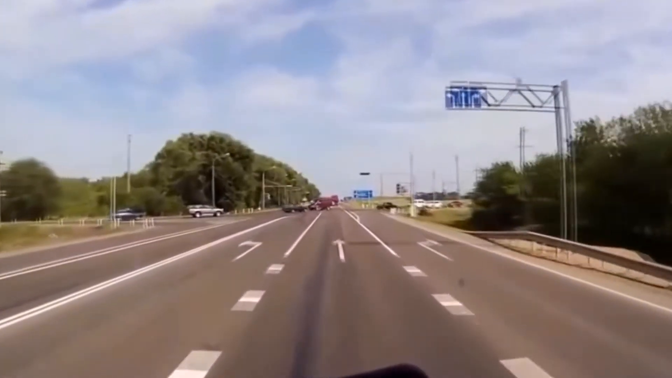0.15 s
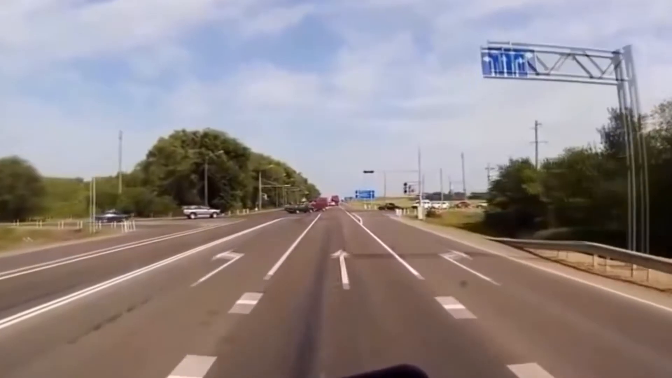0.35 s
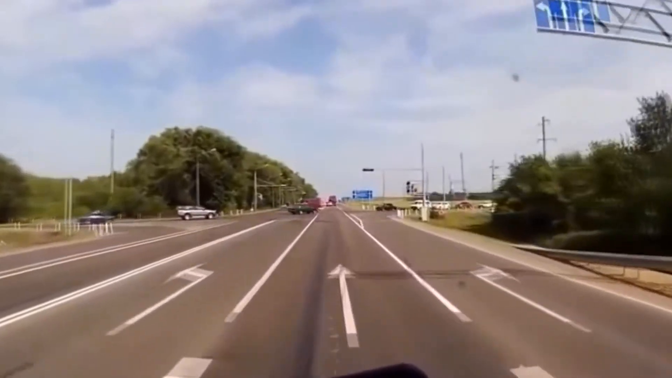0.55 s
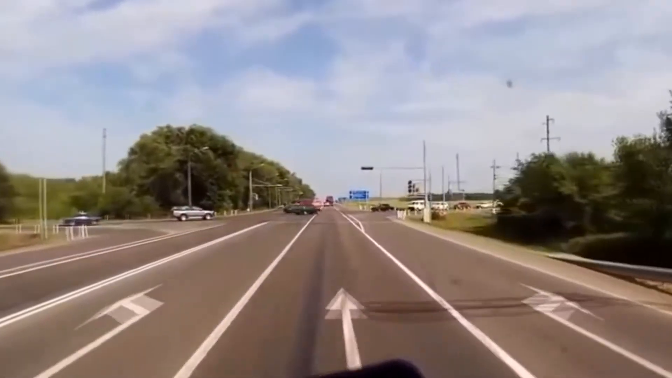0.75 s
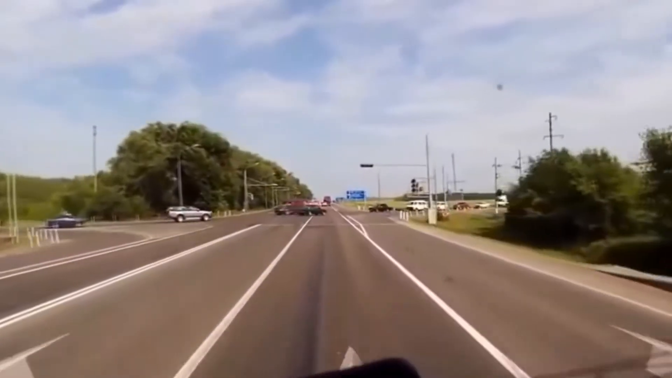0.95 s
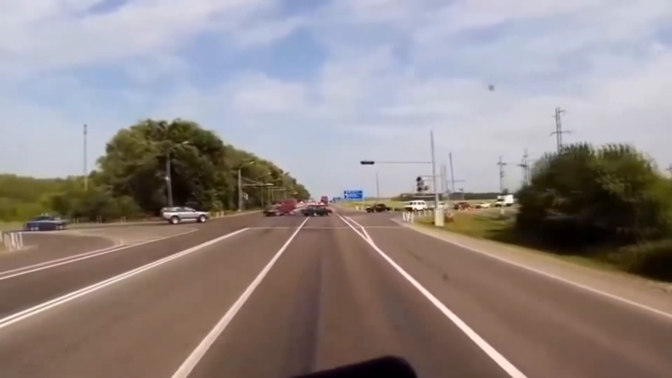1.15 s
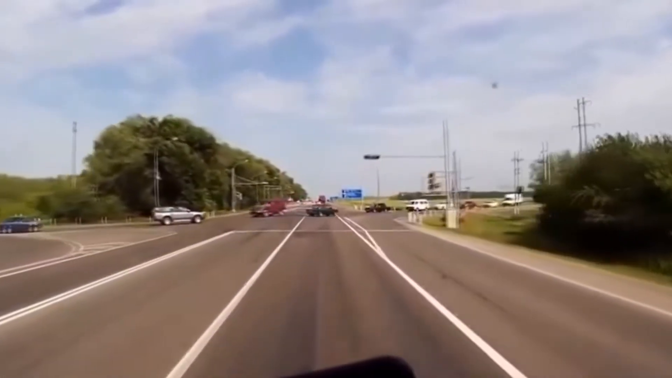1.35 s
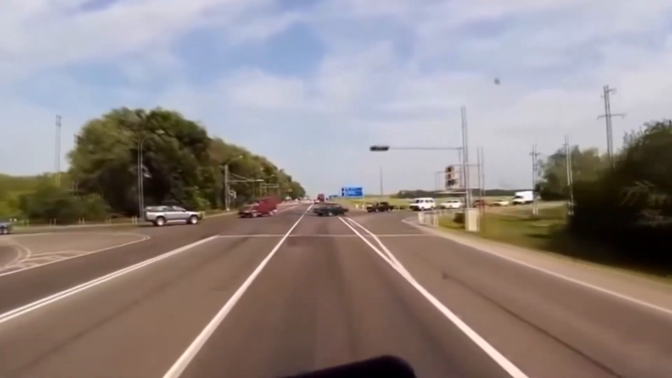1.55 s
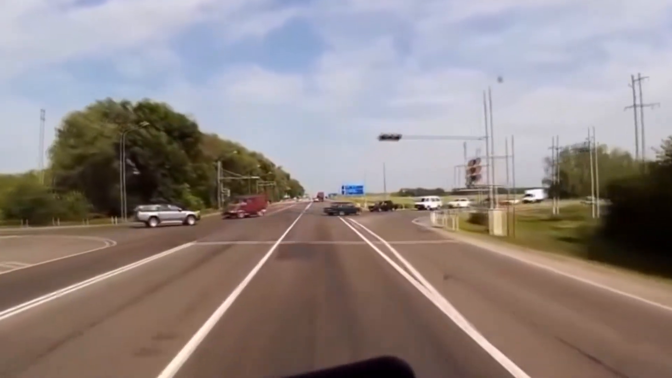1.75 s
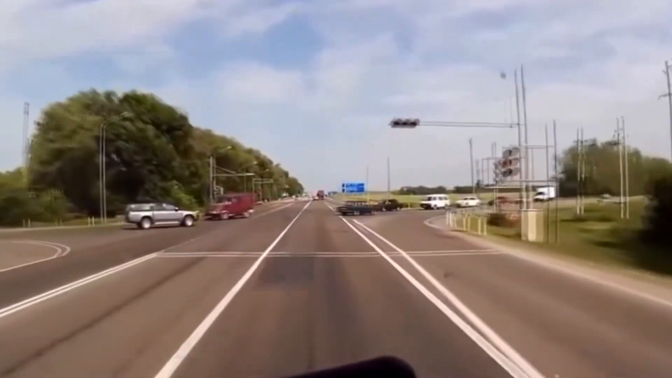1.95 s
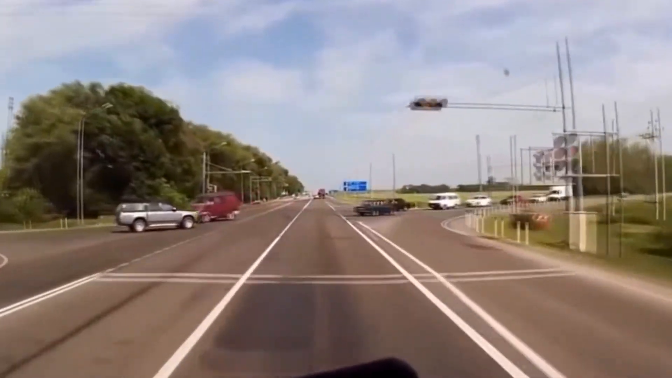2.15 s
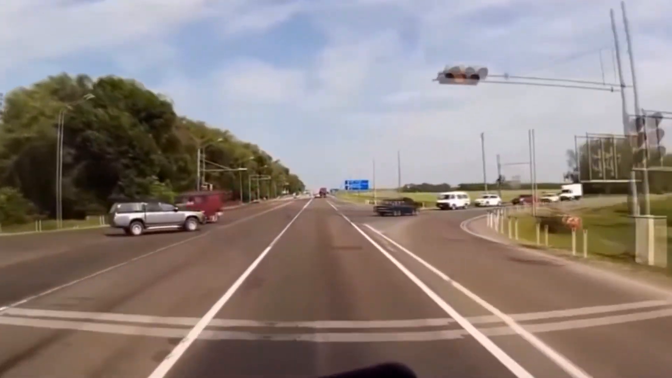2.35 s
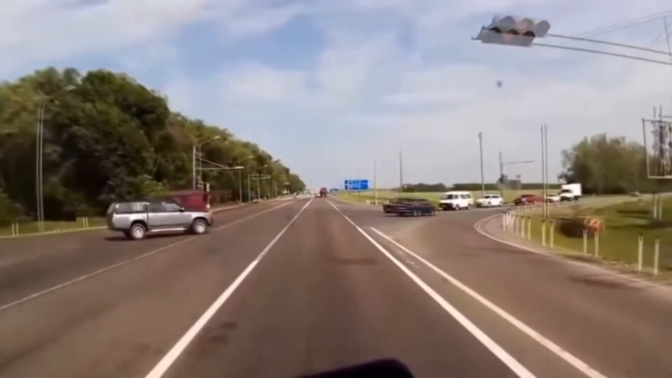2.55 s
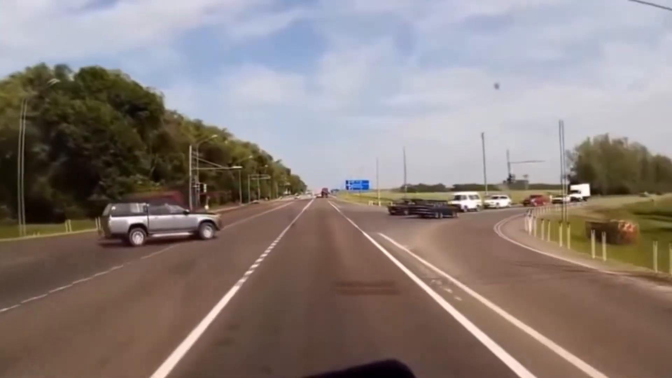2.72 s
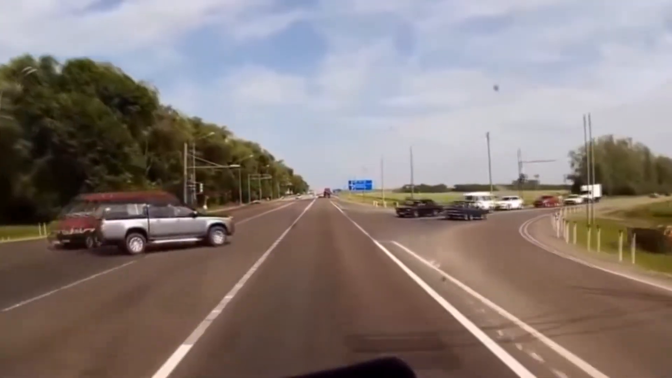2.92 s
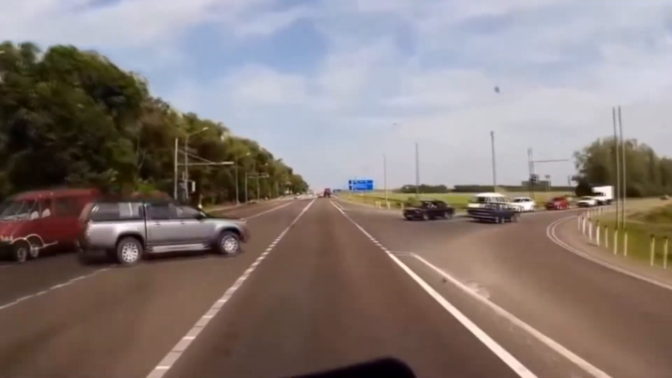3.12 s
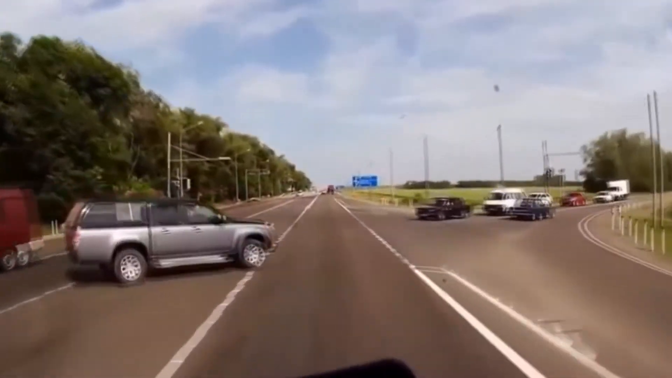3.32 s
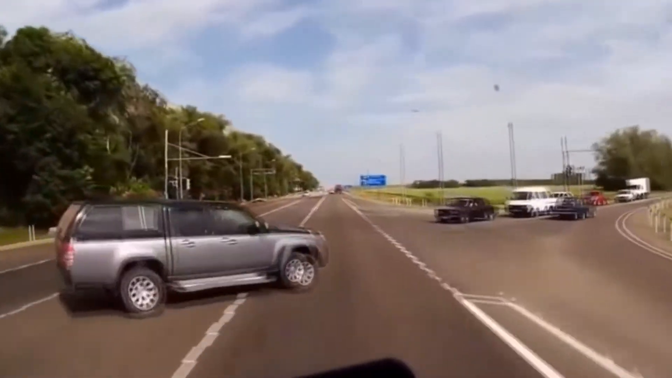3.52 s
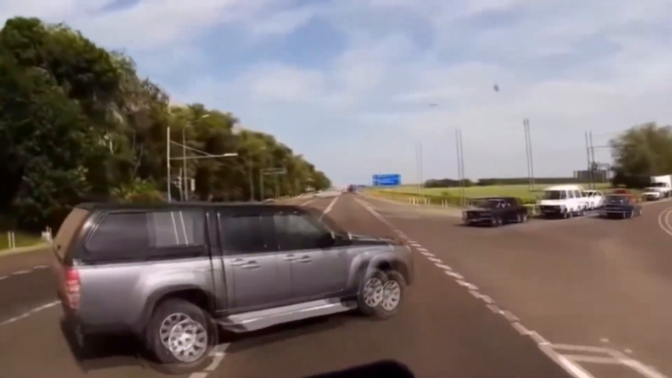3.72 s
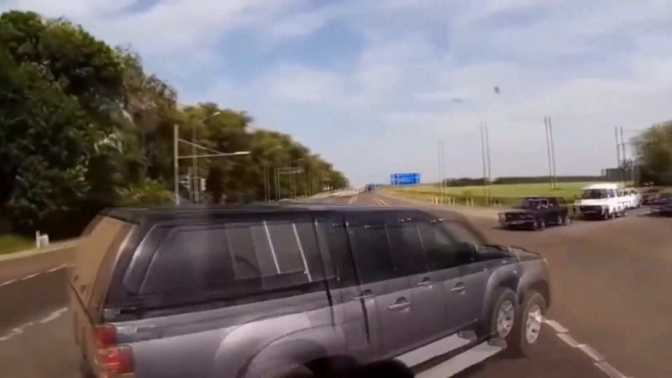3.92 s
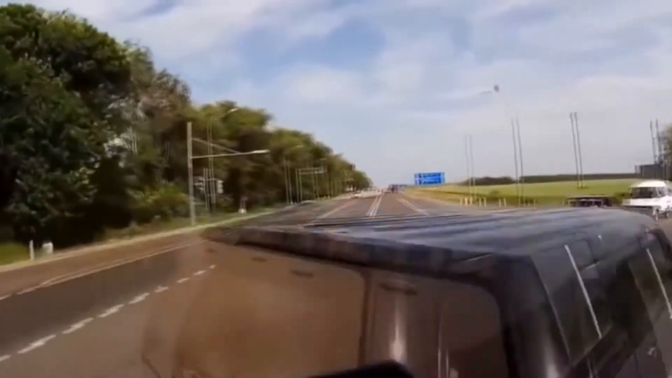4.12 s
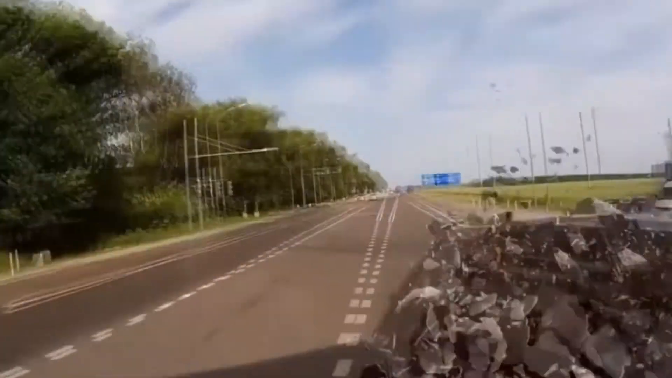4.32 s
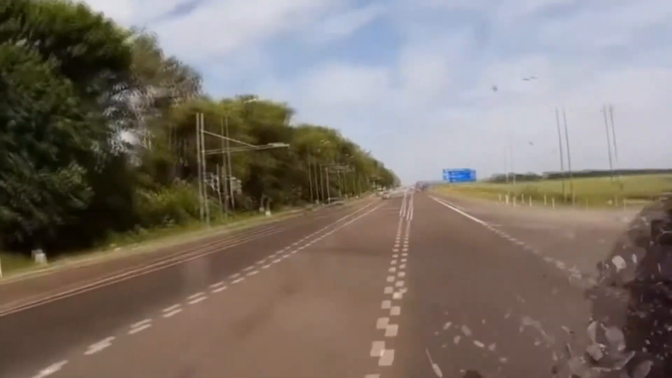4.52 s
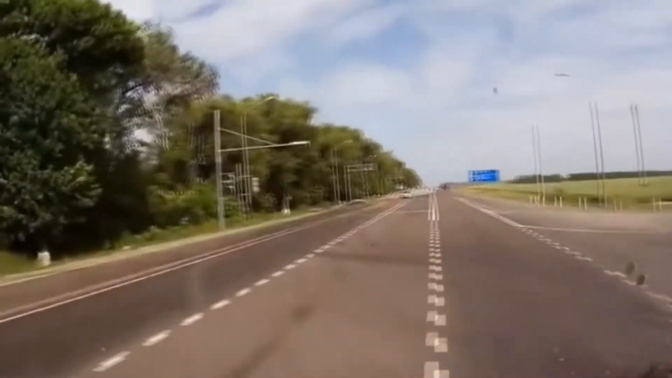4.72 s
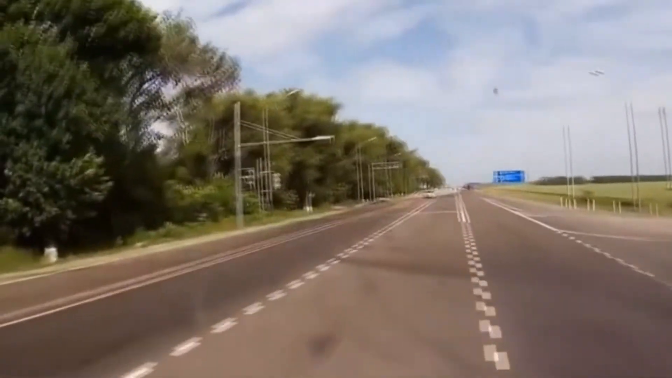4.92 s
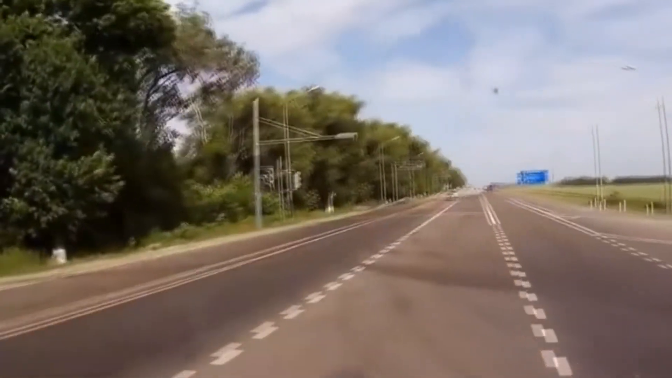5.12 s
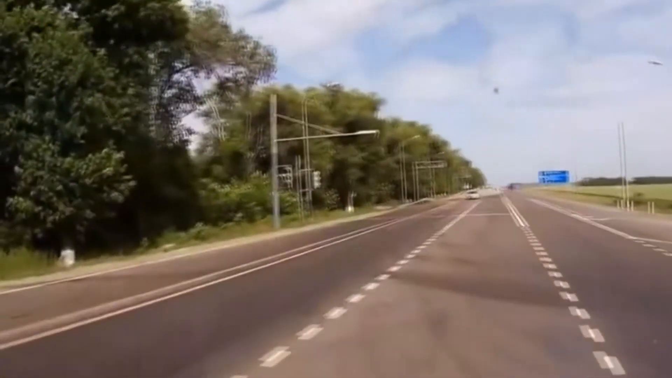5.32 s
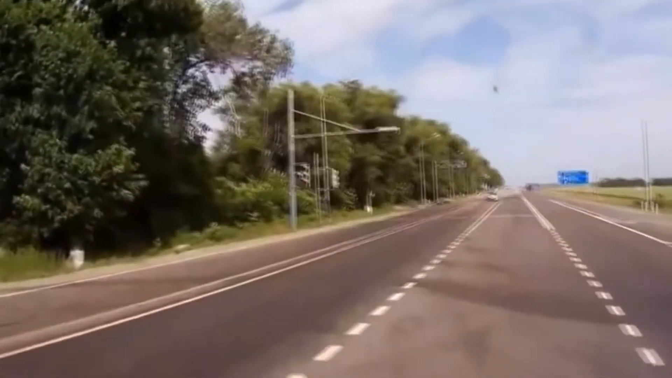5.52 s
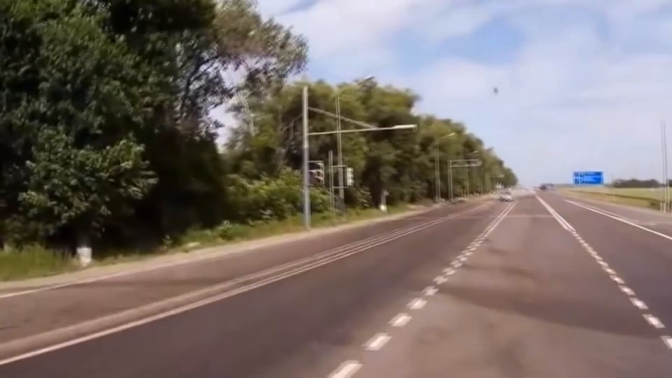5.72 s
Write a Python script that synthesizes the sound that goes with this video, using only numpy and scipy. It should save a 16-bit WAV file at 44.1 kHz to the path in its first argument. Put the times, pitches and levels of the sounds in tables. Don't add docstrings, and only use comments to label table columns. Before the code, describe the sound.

A close, boxy truck cab at highway speed, heard by a small dashboard microphone, nearly mono. For the first 2.4 seconds a steady low engine hum sits over deep cab boom and dull tyre roar, with barely audible trim noise. The driver lifts off; the engine drone sags and vanishes by about 2.7, with a hard pedal clack at 2.67. More knocks come around 3.1 to 3.25, then braked tyres scrub brightly and moan at a nearly steady middle pitch from 3.3 to 4.3, joined by a faint rising squeal from 4.1. At 4.33 the collision hits: a violent, clipped burst of heavy thuds, crumpling panels and shattering glass, strongest until about 4.65 and fading by 4.9. Afterwards a deep wobbling boom continues while torn parts clack, chips tick and loose debris and trim rattle, thinning out to the end at 5.76.

```python
import sys
import numpy as np
from scipy import signal
from scipy.fft import rfft, irfft, next_fast_len
from scipy.io import wavfile
from scipy.ndimage import uniform_filter1d, map_coordinates

SR = 44100
rng = np.random.default_rng(int(sys.argv[2]) if len(sys.argv) > 2 else 0)


def nominal_scale(level):
    x = np.asarray(level, float) / 20
    return 10 ** x


def wav_record(signal):
    frames = np.transpose(np.atleast_2d(signal))
    bounded = np.clip(frames, -1, 1)
    quanta = np.round(bounded * 32767).astype(np.int16)
    wavfile.write(sys.argv[1], SR, quanta)


N = 254016
TIME = np.arange(N) / SR

# time in seconds, level in dB.
CRUSH_FORCE = [(4.325, -56), (4.336, -9.5), (4.346, 1), (4.365, 4.5), (4.45, -3), (4.5, -0.5),
               (4.65, -13.5), (4.8, -23), (4.92, -35.5)]
# start in seconds, level in dB, pitch in Hz signed by direction, t60 in seconds.
CHASSIS_BLOWS = [
    (4.338, -0.5, 58.5, 0.13),
    (4.371, 5.5, -50, 0.18),
    (4.412, -5, 90.5, 0.22),
    (4.441, 5.5, -30, 0.35),
    (4.517, 4, -185, 0.15),
    (4.55, -2.5, 33.5, 0.12),
    (4.599, -6, 30.5, 1),
]
# centre in Hz, width in Hz, level in dB.
PANEL_MODES = [(73.2, 23.7, 6), (124.7, 32.5, 6.5), (196.3, 46.7, 6.5), (289, 121, 1.5), (480, 378, -4),
               (832, 328, -6), (1440, 350, -12)]
# time in seconds, half length
# in seconds, direction.
LIMIT_SHOVES = [(4.378, .0018, -1), (4.389, .001, 1), (4.451, .004, -1), (4.467, .002, 1),
                (4.49, .0022, -1), (4.506, .001, 1), (4.516, .001, 1), (4.606, .004, 1), (4.628, .002, -1)]
# time in seconds, half length in seconds, level in
# dB, direction.
BRIEF_PUSHES = [
    (4.495, .004, -6.5, -1),
    (4.556, 0.0026, -8, -0.92),
    (4.619, 0.0049, -9, 0.88),
    (4.642, 0.0024, -12, -1),
]
# time in seconds, level in dB over the shatter, fade in seconds.
PANE_CRACKS = [(4.4555, 1.5, 0.0067), (4.4824, 2.5, .006), (4.493, 7, 0.013), (4.52, 4.5, 0.0088),
               (4.55, 7, 0.022), (4.575, 0.5, 0.018), (4.612, 1.5, .014), (4.633, 3.5, 0.011),
               (4.647, 3.5, 0.0087), (4.672, 3, 0.011)]
# frequency in Hz, level in dB per Hz.
GLASS_SPECTRUM = [(400, -120), (600, 1.5), (1500, 0.5), (2500, -5), (4000, -9.5), (8000, -37), (15500, -39),
                  (16000, -120)]
HUSH_DB, SHOVE_DB = -12, -3
GLASS_DB, GLASS_GROWS = -13.5, 0.63
GLASS_GONE_S, GLASS_GONE_DB, GLASS_DULL_S = 4.7, -12, 4.68

# time in seconds, pitch in Hz.
BOOM_PITCH = [(0, 33.6), (2.35, 32.61), (2.5, 27.1), (2.95, 25.2), (3.26, 27.94), (3.6, 25.57),
              (3.85, 33.41), (4.15, 38.97), (5.76, 37.8)]
# frequency in Hz, level in dB per Hz.
THROB_SPECTRUM = [(15, -120), (20, 22), (27, 4), (36, 8.5), (48, -26), (70, -37), (120, -120)]
# time in seconds, boom in dB, rumble in dB, half length in seconds.
ROAD_BUMPS = [(0.0, -20, -23, 0.0072), (0.256, -41, -46, 0.04), (0.55, -38, -46, 0.15),
              (1.07, -35, -46, 0.14), (1.385, -29.5, -39, 0.024), (1.62, -35, -48, 0.057),
              (1.936, -37, -49, 0.066), (2.152, -38, -41, 0.057), (2.27, -29, -36, 0.074),
              (2.486, -40, -27, 0.03), (2.725, -24.5, -31.5, 0.041), (2.935, -26.5, -48, 0.12),
              (3.286, -24, -30.5, 0.14), (3.535, -41, -27.5, 0.028), (3.62, -32, -36, 0.033),
              (3.804, -27, -29.5, 0.084), (4.127, -29, -36, 0.16), (4.276, -30.5, -56, 0.045),
              (4.875, -36, -26, 0.0067), (4.999, -31, -26.5, 0.023), (5.11, -23, -44, 0.023),
              (5.261, -25.5, -25.5, 0.044), (5.452, -39, -38.5, 0.24), (5.76, -42, -46, 0.028)]
BOOM_DB, FREE_BOOM_DB = -34, -26.5

# time in seconds, level in dB.
TYRE_LOAD = [(0, -43), (3.05, -42.5), (3.27, -34.5), (4.05, -35), (4.22, -33), (4.86, -33), (5.14, -45),
             (5.27, -37), (5.76, -46.5)]
# time in seconds, braking share from 0 to 1.
BRAKING_SHARE = [(3.1, 0.19), (3.3, 0.82), (4.3, 0.73), (4.9, 0.45), (5.3, 0.6)]
# frequency in Hz, level in dB per Hz.
RUMBLE_SPECTRUM = [(26, -36), (45, 4.5), (60, 1), (210, 3), (302, -10), (355, -7.5), (421, -23.5),
                   (466, -25), (500, -21), (650, -20), (1100, -120)]
ROAR_SPECTRUM = [(180, -10.5), (300, -6), (412, -8.5), (507, -5.5), (550, -9), (863, -12.5), (962, -16.5),
                 (1340, -19.5), (2600, -40.5), (3380, -75), (5720, -120)]
SCRUB_SPECTRUM = [(310, -18), (520, -2.5), (699, -3), (774, -21.5), (873, -2), (1070, -2), (1500, -1.5),
                  (2270, -22), (2600, -29.5), (3380, -58), (5720, -120)]
RUMBLE_DB, BRAKED_RUMBLE_DB, SETTLED_RUMBLE_DB = -31, -38, -43.5

# multiple of the firing rate, level in dB.
GEAR_ORDERS = [(3.83, -47), (6.45, -54)]
FIRING_HZ, LIFT_S, SAG_HZ_PER_S = 79.75, 2.36, 20
FIRING_DB, OCTAVE_DB = -36.5, -29.5
SURGE_DB, SURGE_S = 4, 0.09

# time in seconds, pitch in Hz, level in dB.
MOAN_TRACK = [(3.27, 461.6, -48), (3.29, 459.7, -27.5), (3.33, 463, -39), (3.38, 480.3, -39),
              (3.42, 485, -35), (3.48, 476.5, -29), (3.54, 473.3, -27), (3.66, 471.4, -28),
              (3.724, 472.5, -27), (3.8, 477.4, -30), (3.92, 479.6, -27.5), (3.978, 481.8, -29.5),
              (4.054, 482, -31.5), (4.134, 484.3, -34), (4.33, 492.7, -30)]
GRIP_TIMES = [3.37, 3.678, 3.944, 3.994, 4.1]
GRIP_S, GRIP_DB = 0.009, -12

# time in seconds, pitch in Hz, level in dB.
SKID_TRACK = [(4.06, 960, -55), (4.13, 1040, -38), (4.2, 1200, -39), (4.27, 1470, -39), (4.33, 1600, -41)]
# time in seconds, level in dB.
DRUM_LEVEL = [(3.24, -56), (3.32, -41), (3.5, -46), (3.7, -50), (4.05, -53), (4.3, -51)]
DRUM_HZ = 1510

# start in seconds, peak in dB, ring in Hz, mid knock in dB, crack in dB.
PEDAL_CLACKS = [(2.542, -30.5, 1214, -18, -18), (2.6749, -11.5, 1548, -10.5, -19.5),
                (3.088, -19.5, 734, -40, -53), (3.1, -30.5, 800, -45, -60), (3.091, -21, 1500, -30, -60),
                (3.145, -18.5, 1485, -16, -46), (3.182, -19.5, 737, -40, -65), (3.194, -36, 890, -40, -65),
                (3.204, -39, 740, -45, -65), (3.184, -17, 1480, -40, -65), (3.25, -22, 1610, -11.5, -49),
                (4.328, -13, 977, -8.5, -16.5), (4.785, -23, 1480, -6.5, -30), (4.838, -25, 1830, -6, -28)]
TORN_PARTS = [(4.703, -20.5, 762, -26, -45), (4.717, -22, 1327, -24, -55), (4.748, -21, 1410, -25, -55),
              (4.765, -29, 917, -24, -45), (4.8, -18.5, 760, -30, -55), (4.817, -20.5, 1510, -20, -40),
              (4.85, -18, 1290, -10, -42), (4.873, -31, 596, -7, -45), (4.895, -27.5, 404.5, -20, -46),
              (4.93, -26, 825, -35, -50), (4.968, -24.5, 822, -22, -44), (5.01, -27, 664, -18, -45),
              (5.052, -23.5, 1240, -20, -45), (5.099, -33, 619, -29, -44), (5.182, -36, 790, -21, -40),
              (5.256, -23, 1235, -13, -38), (5.271, -19.5, 1387, -7, -40), (5.399, -28, 1010, -9, -40),
              (5.42, -30, 607, -30, -45)]
FURTHER_CLACKS = [(.739, -42, 910, -40, -60), (1.638, -37.5, 806, -40, -60), (3.114, -31, 1560, -40, -60),
                  (3.157, -35, 1390, -40, -60), (3.229, -33, 1550, -40, -60), (3.283, -24, 1500, -40, -60),
                  (4.329, -13, 1670, -30, -50), (5.186, -33, 2204, -40, -60)]
CLACK_CYCLES = 21.2

# start in seconds, peak in dB, ring in Hz, bright part in dB, t60 in seconds.
LOOSE_DEBRIS = [(2.863, -49, 3232, -34, 0.037), (2.9229, -59, 3200, -29.5, 0.035),
                (3.48, -51.5, 3130, -1, 0.042), (3.68, -40, 3850, -42, 0.069),
                (4.0867, -38.5, 3067, -26, 0.043), (4.186, -37, 3215, -20, 0.068),
                (4.2187, -39, 3130, -48, 0.065), (4.842, -31, 3660, -31, 0.036),
                (4.9631, -32, 2850, -23, 0.065), (4.974, -38, 3100, -28, .05),
                (5.126, -49, 3102, -27, 0.035), (5.1844, -38, 2660, -29, 0.024),
                (5.246, -41, 3330, -6.5, 0.035), (5.268, -33.5, 3670, -30, .09),
                (5.4, -40.5, 3600, -28, 0.071), (5.459, -50.5, 3300, -0.5, 0.046),
                (5.4865, -33.5, 3470, -32.5, 0.036), (5.711, -41, 3140, -25, 0.072),
                (5.74, -42, 3640, -20, 0.032)]
HARD_CHIPS = [(2.5415, -43, 5400, -19, 0.0064), (2.589, -45, 5170, -25.5, 0.018),
              (2.6746, -25, 6700, -16, 0.0068), (3.51, -40, 5424, -12, 0.018),
              (4.427, -17, 4860, 1.5, 0.023), (4.438, -14.5, 4680, 1.5, 0.049),
              (4.7845, -23.5, 4950, -21.5, 0.0062), (4.809, -22.5, 5130, -13.5, 0.013),
              (5.0525, -39.5, 6360, 4.5, 0.031), (5.1123, -49.5, 4750, 6, 0.017)]

# time in seconds, level in dB.
CAB_SHAKING = [(2.5, 0), (3.3, 2.5), (4.3, 8.5), (5.0, 8.5), (5.3, 6.5), (5.76, 0)]
# frequency in Hz, level in dB per Hz.
BUZZ_SPECTRUM = [(1290, -18.5), (2200, -14), (2250, -40), (2520, 4), (3110, 11.5), (4150, -4),
                 (4530, -25.5), (5000, -3.5), (6500, -40.5), (11000, -120)]
HISS_SPECTRUM = [(2470, -21), (4200, 2.5), (4710, -7.5), (6850, -4.5), (7520, -8.5), (7640, -17),
                 (9360, -3.5), (10800, -10.5), (13700, -9.5), (14700, -19.5), (15600, -41)]
SHAKEN_SPECTRUM = [(1060, -41), (1800, -1.5), (2400, -20.5), (3010, -9), (4060, -8.5), (4690, -20.5),
                   (5280, -15.5), (7570, -22), (9750, -20.5), (13700, -24.5), (15600, -32)]
# peak time in seconds, peak in dB, seconds to swell 20 dB, seconds to fall 20 dB.
TRIM_JOLTS = [(.52, -69, .01, .05), (.64, -70, .01, .05), (1.11, -67, .01, .04), (1.22, -71, .01, .04),
              (2.2, -70, .02, .06), (2.54, -62, .01, .05), (2.588, -65.5, .01, .06), (2.66, -55, .025, .04),
              (2.87, -70, .05, .03), (2.924, -62, .03, .025), (3.03, -66, .08, .8), (3.166, -57, .1, .07),
              (3.4, -68, .8, .4), (3.51, -54, .06, .06), (3.62, -58, .1, .08), (3.7, -60, .05, .15),
              (3.808, -56.5, .2, .06), (3.892, -56, .1, .065), (4.025, -56, .045, .04),
              (4.196, -51, .1, .1), (4.27, -63, .05, .04), (4.84, -50, .006, .06), (4.86, -62, .05, .25),
              (4.97, -64, .2, .4), (5.054, -46.5, .006, .025), (5.118, -52, .01, .045),
              (5.258, -46.5, .055, .09), (5.41, -56, .15, .025), (5.46, -60, .008, .5),
              (5.712, -61, .1, .3), (5.76, -56, .01, .04)]
# start in seconds, end in seconds, pitch in Hz, level in dB.
HINGE_SQUEAKS = [
    (3.04, 3.151, 6885, -71),
    (3.115, 3.145, 5265, -70),
]
# pitch in Hz, level in dB.
ELECTRIC_WHINE = [(7854, -81)]
BUZZ_DB, HISS_DB, HISS_GROWS = -60, -67, 0.78

# frequency in Hz, level in dB under the sound.
CHANNEL_DIFFERENCE = [(250, -28), (1000, -31.5), (4000, -10), (12000, -8)]
# start in seconds, end in seconds, lowest Hz, highest Hz.
CHANNEL_SPLITS = [(2.68, 2.65, 300, 15750), (4.33, 4.31, 300, 9000), (4.44, 4.42, 5000, 15750),
                  (4.6, 4.68, 100, 2800), (4.62, 4.62, 5500, 8500), (4.77, 4.8, 1200, 8500),
                  (5.06, 5.03, 1500, 4000)]
# start in seconds, end in seconds.
TOP_BAND_TIMES = [(4.35, 4.55), (4.79, 4.77), (5.065, 5.04), (5.125, 5.09)]
# frequency in Hz, level in dB per Hz.
SIDE_HISS_SPECTRUM = [(3500, -120), (4500, -5), (8000, 4), (12000, -2), (12600, -120)]
RAIL = .3
TOP_HZ, QUIET_TOP_HZ = 15750, 15200


def unit(x):
    return x / np.sqrt(np.mean(x ** 2) + 1e-20)


def curves(rows):
    s, *cols = np.transpose(rows)
    return [np.interp(TIME, s, c) for c in cols]


def wobble(rate):
    knots = rng.standard_normal(int(N * rate / SR) + 4)
    return map_coordinates(knots, [np.arange(N) * rate / SR])


def filtered(x, response):
    m = next_fast_len(N + SR // 2)
    return irfft(rfft(x, m) * response(np.fft.rfftfreq(m, 1 / SR)), m)[:N]


def log_response(rows):
    f, db = np.transpose(rows)
    return lambda hz: nominal_scale(np.interp(np.log(hz + 1), np.log(f + 1), db))


def rush(spectrum, patchy_db, grain_db=1.65):
    z = signal.stft(rng.standard_normal(N), nperseg=512)[2]
    field = uniform_filter1d(rng.standard_normal(z.shape), size=6, axis=0)
    field = uniform_filter1d(field, size=10, axis=1)
    x = signal.istft(z * nominal_scale(patchy_db * unit(field)), nperseg=512)[1][:N]
    return unit(filtered(x * nominal_scale(grain_db * wobble(250)), log_response(spectrum)))


def tone(hz, wander_hz, rate):
    return np.sqrt(2) * np.sin(2 * np.pi * np.cumsum(hz + wander_hz * wobble(rate)) / SR)


def gate(t0, t1):
    return np.interp(TIME, [t0 - .03, t0, t1, t1 + .05], [0, 1, 1, 0])


def bell(s, half, power=2):
    return np.exp(-((TIME - s) / half) ** power)


def humps(column):
    return sum(nominal_scale(row[column]) * bell(row[0], row[3]) for row in ROAD_BUMPS)


def swells(rows):
    levels = [db - 20 * np.maximum((s - TIME) / rise, (TIME - s) / fall) for s, db, rise, fall in rows]
    return nominal_scale(np.max(levels, axis=0))


def decay(t, t60, rise):
    return nominal_scale(-60 * t / t60) * (1 - np.exp(-t / rise))


def band_burst(t, lo_hz, hi_hz, t60, rise, strike=0):
    sos = signal.butter(3, [lo_hz, hi_hz], "bandpass", fs=SR, output="sos")
    click = signal.sosfilt(sos, 1. * (t == 0))
    noise = unit(signal.sosfilt(sos, rng.standard_normal(len(t))))
    return noise * decay(t, t60, rise) + strike * click / click.max()


def smear(x):
    z = signal.stft(x, nperseg=256)[2]
    z = np.abs(z) * np.exp(2j * np.pi * rng.random(z.shape))
    return signal.istft(z, nperseg=256)[1][:N]


def panel_response(f):
    return sum((-1) ** k * nominal_scale(db) * 1j * f * w / (c * c - f * f + 1j * f * w)
               for k, (c, w, db) in enumerate(PANEL_MODES))


def crumpling(panel_db):
    lumps = rng.standard_normal(N) * nominal_scale(1.6 * wobble(60))
    return nominal_scale(panel_db) * unit(filtered(lumps, panel_response))


def shattering(panel_db):
    shatter_db = GLASS_DB + GLASS_GROWS * panel_db + GLASS_GONE_DB * gate(GLASS_GONE_S, 6)
    for s, db, fade in PANE_CRACKS:
        shatter_db = shatter_db + db * (np.arange(N) >= s * SR) * np.exp(-np.abs(TIME - s) / fade)
    glass = nominal_scale(1.2 * wobble(90)) * rush(GLASS_SPECTRUM, patchy_db=1.5, grain_db=4)
    fine = filtered(glass, lambda hz: hz > 7000)
    return nominal_scale(shatter_db) * (glass - gate(GLASS_DULL_S, 6) * fine)


def collision():
    panel_db, = curves(CRUSH_FORCE)
    panel_db = panel_db + sum(HUSH_DB * bell(s, half, 4) for s, half, _ in LIMIT_SHOVES)
    out = crumpling(panel_db) + shattering(panel_db)
    out += nominal_scale(SHOVE_DB) * sum(way * bell(s, half, 4) for s, half, way in LIMIT_SHOVES)
    out += sum(way * nominal_scale(db) * bell(s, half) for s, half, db, way in BRIEF_PUSHES)
    for s, db, hz, t60 in CHASSIS_BLOWS:
        t = np.maximum(TIME - s, 0)
        out += nominal_scale(db - 60 * t / t60) * np.sin(2 * np.pi * hz * t)
    return out * gate(4.35, 5.2)


def cab_boom():
    hz, = curves(BOOM_PITCH)
    bumpy = np.interp(TIME, [4.3, 4.9], [.5, .08])
    swing = np.sqrt(1 - bumpy) * tone(hz, wander_hz=2.707, rate=10)
    swing = swing + np.sqrt(bumpy) * rush(THROB_SPECTRUM, patchy_db=-1.5)
    level = nominal_scale(BOOM_DB + (FREE_BOOM_DB - BOOM_DB) * gate(4.4, 6)) + humps(column=1)
    return level * nominal_scale(2.3 * wobble(8.7)) * swing


def road():
    roar_db, = curves(TYRE_LOAD)
    rumble_db = RUMBLE_DB + (BRAKED_RUMBLE_DB - RUMBLE_DB) * gate(3.35, 4.3)
    rumble_db = rumble_db + (SETTLED_RUMBLE_DB - RUMBLE_DB) * gate(4.95, 6)
    rumble = (nominal_scale(rumble_db) + humps(column=2)) * rush(RUMBLE_SPECTRUM, patchy_db=-0.5)
    share = np.clip(curves(BRAKING_SHARE)[0], 0, 1)
    roar = np.sqrt(1 - share) * nominal_scale(7.5) * rush(ROAR_SPECTRUM, patchy_db=0.58)
    scrub = np.sqrt(share) * nominal_scale(0.5) * rush(SCRUB_SPECTRUM, patchy_db=.7)
    return rumble + nominal_scale(roar_db) * (roar + scrub)


def engine():
    t = TIME - LIFT_S
    hz = np.maximum(FIRING_HZ - SAG_HZ_PER_S * np.maximum(t, 0), FIRING_HZ / 2)
    firing_db = FIRING_DB + SURGE_DB * bell(LIFT_S + .15, SURGE_S) + .6 * wobble(2.7)
    octave_db = OCTAVE_DB + SURGE_DB * bell(LIFT_S, SURGE_S) + 0.4 * wobble(20)
    firing = nominal_scale(firing_db) * tone(hz, wander_hz=0.4, rate=6)
    octave = nominal_scale(octave_db) * tone(2 * hz, wander_hz=.5, rate=5)
    gears = sum(nominal_scale(db + 1.3 * wobble(6.4)) * tone(k * hz, wander_hz=1.22, rate=9.6) for k, db in GEAR_ORDERS)
    return firing * gate(-1, 2.68) + octave * gate(-1, LIFT_S) + gears * gate(-1, 2.9)


def tyre_moan():
    hz, db = curves(MOAN_TRACK)
    db = db + sum(GRIP_DB * bell(s, GRIP_S) for s in GRIP_TIMES)
    uneven = nominal_scale(1.6 * wobble(45))
    return gate(3.29, 4.33) * nominal_scale(db - 1.5) * uneven * tone(hz, wander_hz=3.54, rate=45)


def brakes():
    hz, db = curves(SKID_TRACK)
    drum_db, = curves(DRUM_LEVEL)
    skid = gate(4.08, 3.9) * nominal_scale(db + 2.5 * wobble(40)) * tone(hz, wander_hz=12, rate=56)
    drum = gate(3.25, 4.3) * nominal_scale(drum_db + 2.8 * wobble(30)) * tone(DRUM_HZ, wander_hz=30, rate=50)
    return skid + drum


def clacks(rows, firm=False):
    out, t = np.zeros(N + SR), np.arange(SR // 5) / SR
    for s, db, hz, mid_db, crack_db in rows:
        t60 = CLACK_CYCLES / hz
        hard = firm and mid_db > -29
        dull = s < CRUSH_FORCE[1][0] and not hard
        rise = .0003 if hard else .0008 if dull else .0015
        modes = [(.8, 0.49 * hard), (.91, 0.44), (1, 0.79), (1.14, 0.24 + 0.27 * hard), (1.27, 0.27 * hard)]
        ring = sum(g * np.sin(2 * np.pi * k * hz * t) for k, g in modes)
        ring = ring * decay(t, (1.7 if hard or dull else 3.2) * t60, rise)
        rattle = band_burst(t, 0.69 * hz, 1.57 * hz, 4.0 * t60, rise, strike=0.85 * hard)
        knock = nominal_scale(mid_db) * band_burst(t, 2500, 4100, 1.6 * t60, rise, strike=2.9 * hard)
        crack = nominal_scale(crack_db) * band_burst(t, 4500, 14000, 0.4 * t60, rise, strike=1.9 * hard)
        hit = ring + (0.2 - 0.15 * dull) * rattle + 0.56 * (knock + crack)
        out[round(s * SR):][:len(t)] += nominal_scale(db + 3.5) * hit
    return out[:N]


def debris():
    out, t = np.zeros(N + SR), np.arange(SR // 5) / SR
    for hard, rows in enumerate((LOOSE_DEBRIS, HARD_CHIPS)):
        for s, db, hz, bright_db, t60 in rows:
            rise = t60 / (16 + 40 * hard)
            ring = band_burst(t, 0.95 * hz, 1.11 * hz, 1.2 * t60, rise, strike=1.25 * hard)
            chirp = np.sin(2 * np.pi * hz * t * (1 + 0.52 * t)) * decay(t, t60, rise)
            wide = band_burst(t, 0.99 * hz, 1.55 * hz, t60, rise, strike=0.96 * hard)
            spit = nominal_scale(bright_db) * band_burst(t, 9000, 15500, t60, rise, strike=1.5 * hard)
            hit = 0.62 * ring + 0.52 * (1 - hard) * chirp + (0.081 + 0.25 * hard) * wide + spit
            out[round(s * SR):][:len(t)] += nominal_scale(db + 1.5) * hit
    return out[:N]


def trim():
    shaking_db, = curves(CAB_SHAKING)
    buzz = nominal_scale(BUZZ_DB + shaking_db) * rush(BUZZ_SPECTRUM, patchy_db=1.5, grain_db=1.2)
    hiss = nominal_scale(HISS_DB + HISS_GROWS * shaking_db) * rush(HISS_SPECTRUM, patchy_db=0.5, grain_db=2.0)
    out = buzz + hiss + nominal_scale(8) * swells(TRIM_JOLTS) * rush(SHAKEN_SPECTRUM, patchy_db=1.5, grain_db=3)
    for t0, t1, hz, db in HINGE_SQUEAKS:
        out += gate(t0, t1 - .04) * nominal_scale(db + 3.5 * wobble(45.0)) * tone(hz, wander_hz=30, rate=40)
    for hz, db in ELECTRIC_WHINE:
        out += nominal_scale(db) * tone(hz, wander_hz=1.5, rate=4.6)
    return out


def scene():
    mono = collision() + cab_boom() + road() + engine() + tyre_moan() + brakes()
    mono = mono + clacks(PEDAL_CLACKS, firm=True) + clacks(TORN_PARTS) + clacks(FURTHER_CLACKS)
    mono = mono + debris() + trim()
    return np.array([mono, mono])


def preamplifier(x):
    clipped = x / (1 + np.abs(x / RAIL) ** 5) ** (1 / 5)
    clipped = clipped + nominal_scale(-18.0) * filtered(x - clipped, lambda hz: 1j * hz / (1500 + 1j * hz))
    creep = lambda hz: .8 + .22 / (1 + 1j * hz / 70)
    return filtered(clipped, lambda hz: creep(hz) / (1 + 1j * hz / 9000) * (hz < TOP_HZ))


def channel_difference(mid):
    unlike_gain = log_response(CHANNEL_DIFFERENCE)
    unlike = filtered(smear(mid), lambda hz: unlike_gain(hz) * (hz < TOP_HZ))
    side = 0.068 * unlike
    for t0, t1, lo, hi in CHANNEL_SPLITS:
        side = side + gate(t0, t1) * filtered(unlike, lambda hz: (hz > lo) & (hz < hi))
    side = side + nominal_scale(-87) * gate(-1, 3.3) * rush(SIDE_HISS_SPECTRUM, patchy_db=10.0)
    bass = filtered(smear(mid), lambda hz: 1 / (1 + (hz / 110) ** 4))
    return side + nominal_scale(-28.0) * bass


def roll_off(x):
    return signal.sosfilt(signal.butter(12, 15750, fs=SR, output="sos"), x)


def record(dry):
    mid = preamplifier(dry[0])
    mid = mid + filtered(smear(mid), lambda hz: nominal_scale(-23) * hz / (hz + 400) * (hz < TOP_HZ))
    top = filtered(mid, lambda hz: hz > QUIET_TOP_HZ)
    mid = mid - top * (1 - np.minimum(sum(gate(t0, t1) for t0, t1 in TOP_BAND_TIMES), 1))
    side = channel_difference(mid)
    return roll_off(np.array([mid + side, mid - side]))


dry = scene()
out = record(dry)
wav_record(out)
```